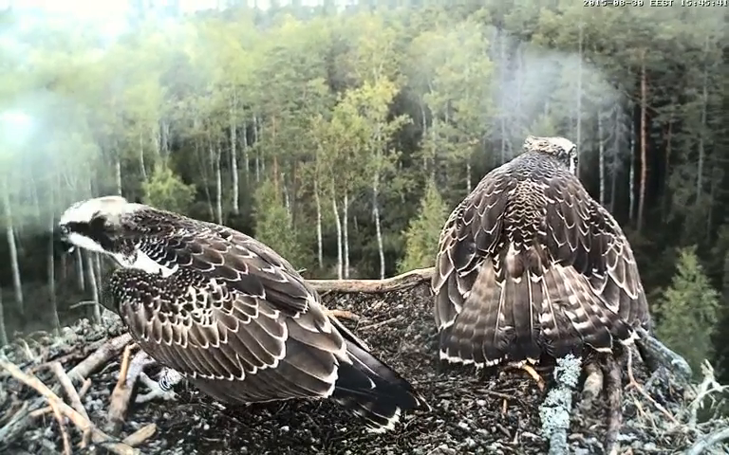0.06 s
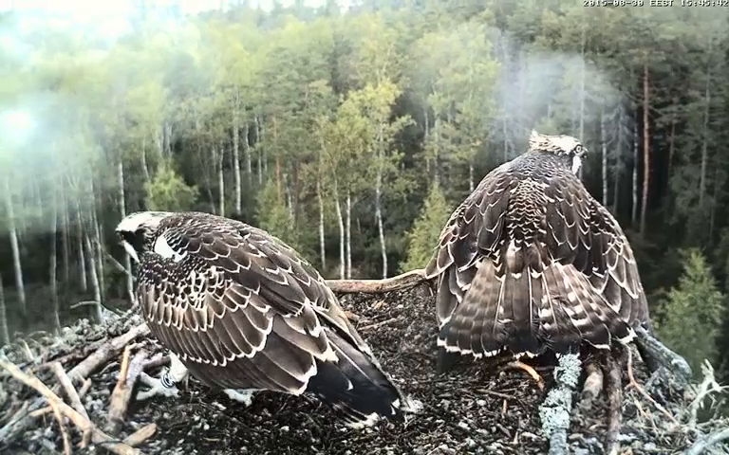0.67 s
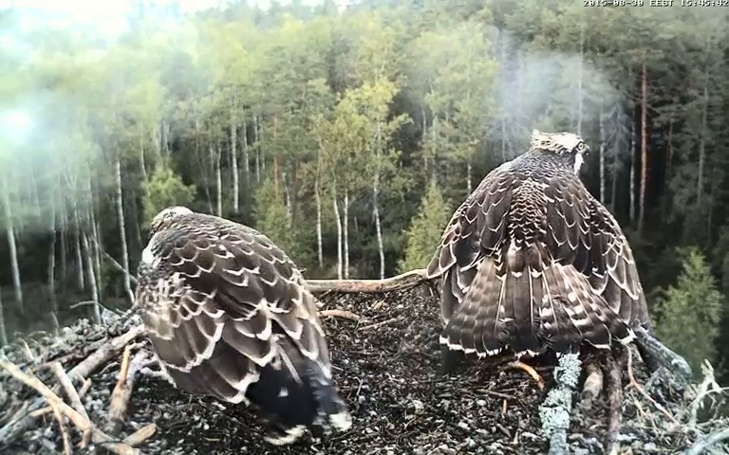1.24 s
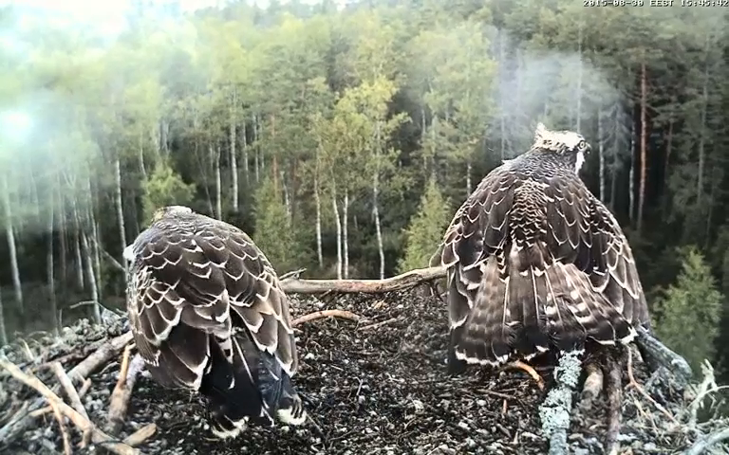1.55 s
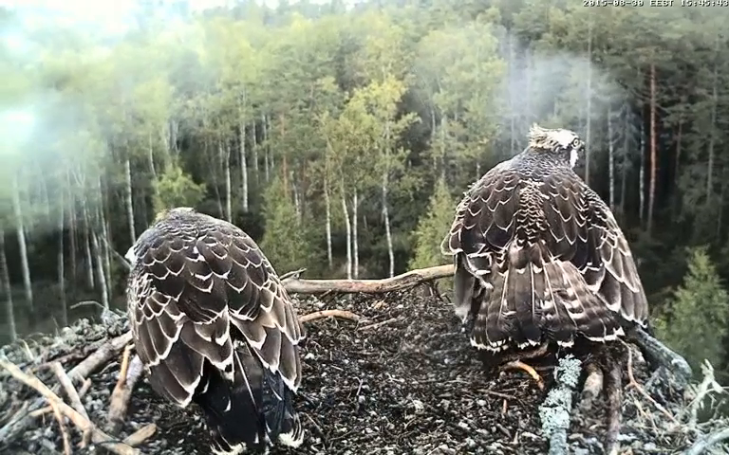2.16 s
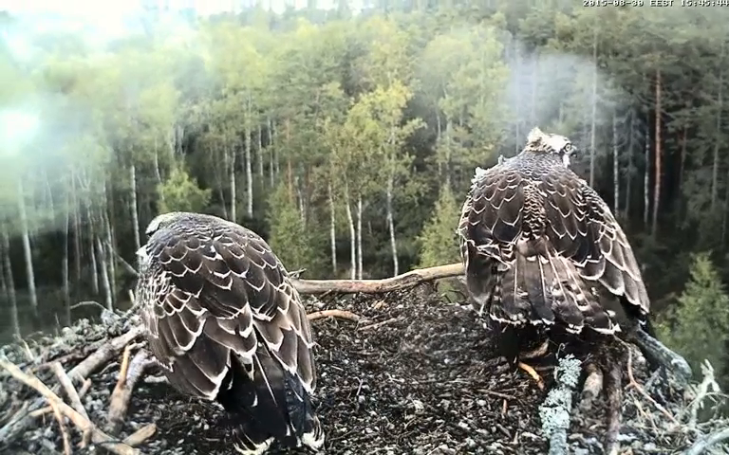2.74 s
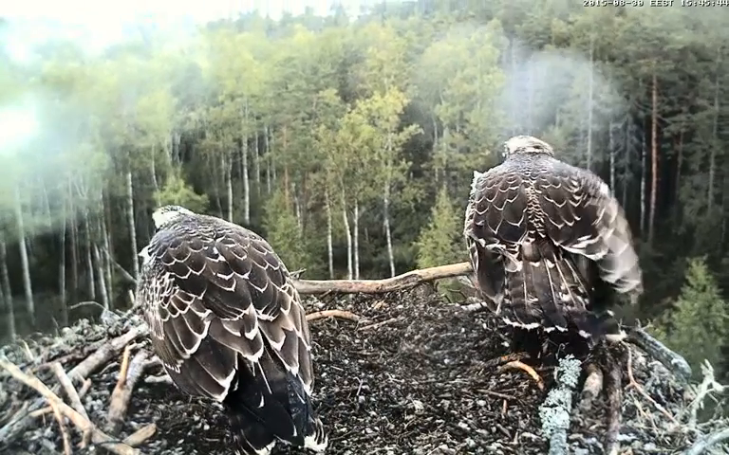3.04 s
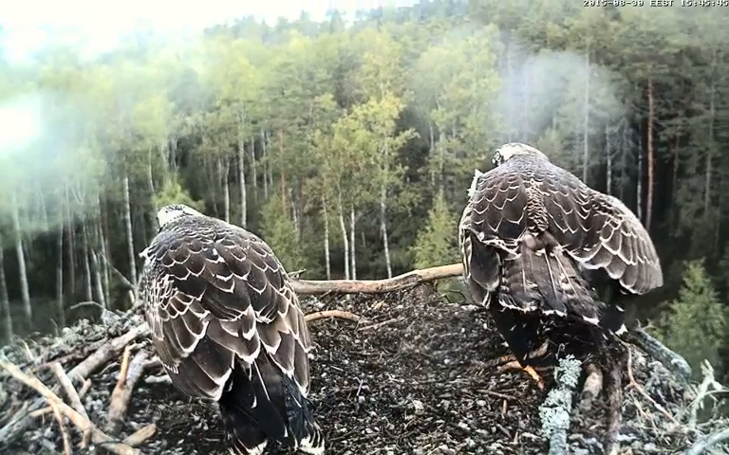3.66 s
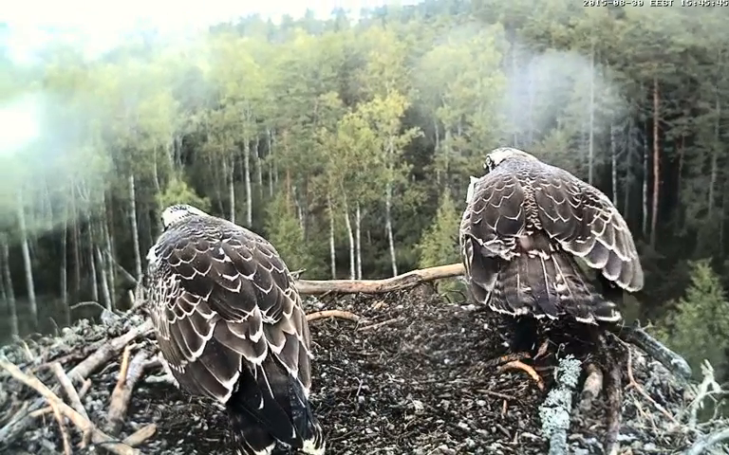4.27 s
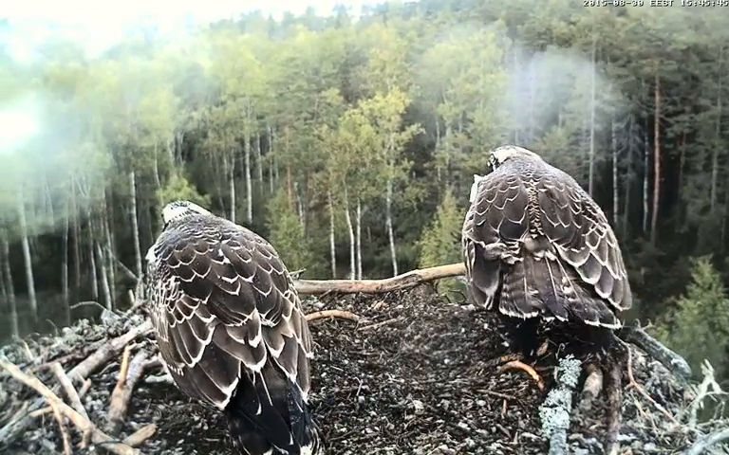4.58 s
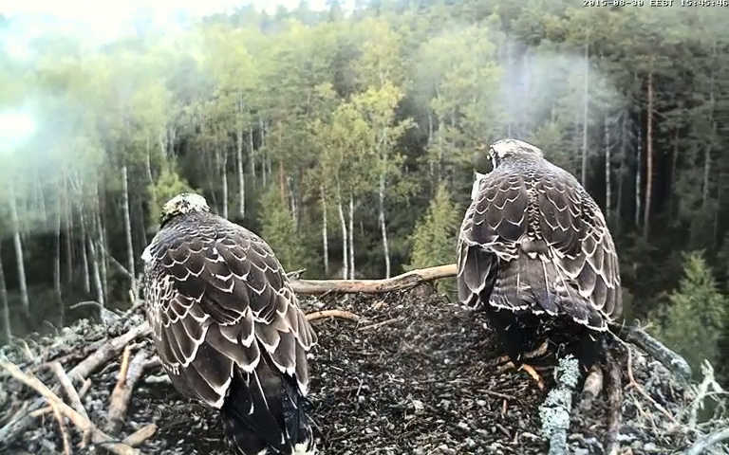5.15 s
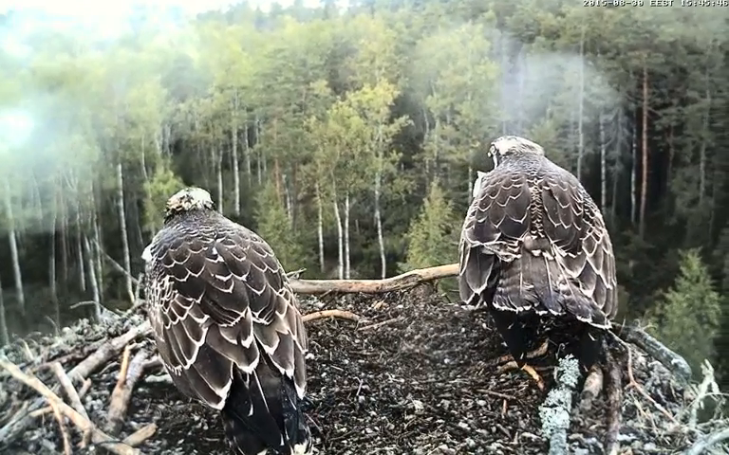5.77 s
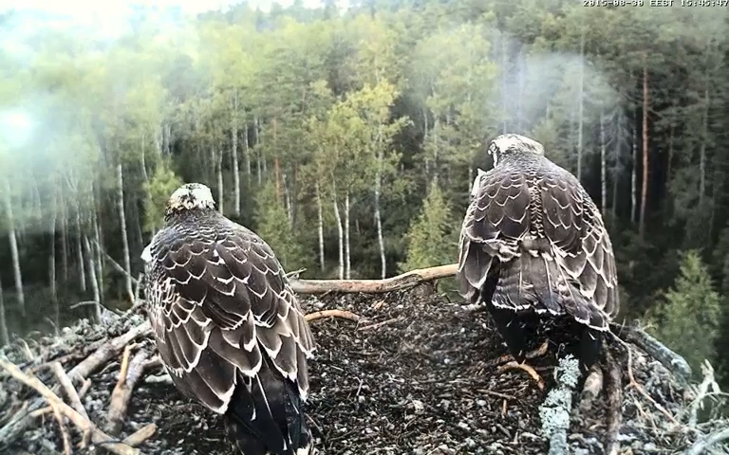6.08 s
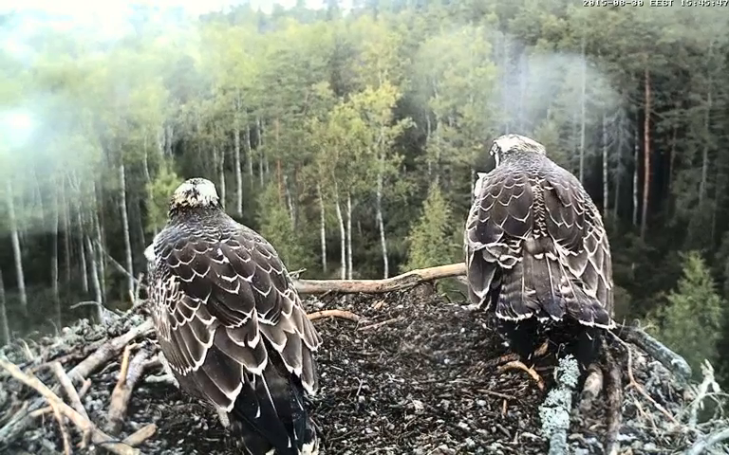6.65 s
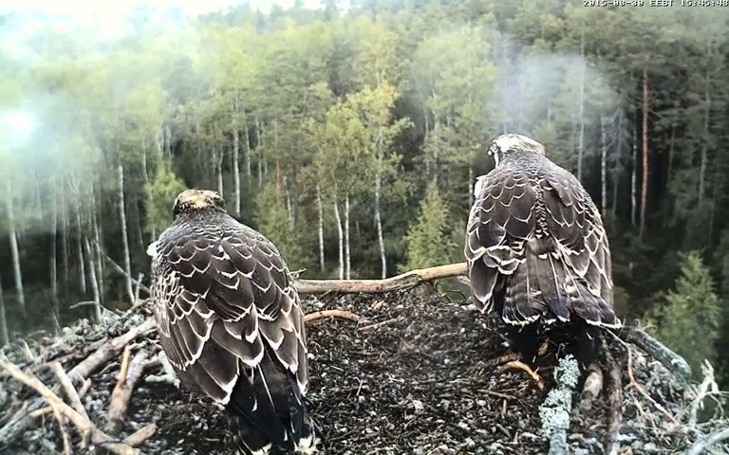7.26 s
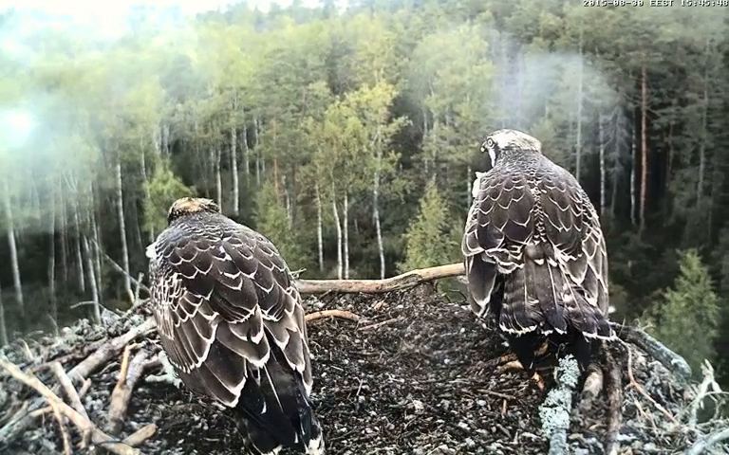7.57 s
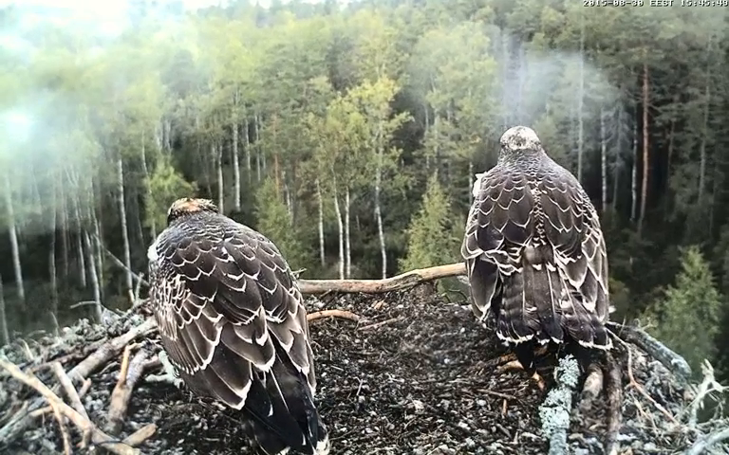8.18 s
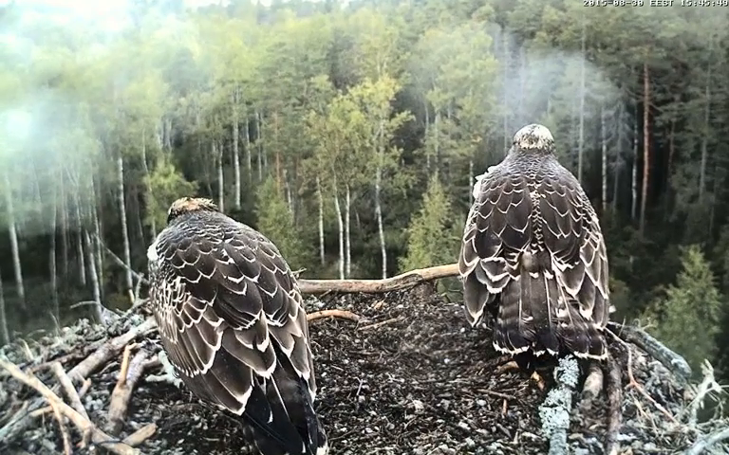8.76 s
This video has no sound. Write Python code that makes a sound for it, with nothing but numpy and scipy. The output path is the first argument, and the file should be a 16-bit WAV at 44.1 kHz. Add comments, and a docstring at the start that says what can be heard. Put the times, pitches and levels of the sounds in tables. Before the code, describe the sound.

Two young ospreys call on a stick nest, close to a microphone with little treble. From the start, one gives short, high chirps, about five a second, each jumping from a lower note into an arched whistle, until 1.7 seconds. A louder run follows from 2.6 to 5 seconds, and a softer one from 6 to 7.2. From about 1 second, the second bird adds thin, rising begging whistles, each about a third of a second long and roughly a second apart, loudest at 4.5. After a gap, two final whistles come alone near 7.9 and 8.5 seconds. Small throat creaks occur around 7 and 7.8. Beaks and talons occasionally tap dry sticks, most clearly at 0.7 and 2.9 seconds. Faint wind rushes throughout, with a slight buffet on the microphone around 6.5, and the trees return a faint echo.

```python
"""Young ospreys on the nest

Two birds call from a stick nest high above a forest, close to a narrow-band microphone.
One fires runs of short chirps, each breaking from a low note up into an arched whistle;
the other draws long, rising begging whistles. Beaks and talons tap the sticks,
a light wind lies underneath, and the trees return a faint late echo."""
import sys
import numpy as np
from scipy import signal
from scipy.fft import rfft, irfft
from scipy.io import wavfile
from scipy.ndimage import uniform_filter1d

SR = 44100
rng = np.random.default_rng(int(sys.argv[2]) if len(sys.argv) > 2 else 0)


def store_wav(level_fs):
    """Save 16-bit WAV to argv[1]."""
    pcm = np.round(np.clip(np.atleast_2d(level_fs), -1, 1) * 32767)
    wavfile.write(sys.argv[1], SR, pcm.T.astype(np.int16))


N = 388962
TIME = np.arange(N) / SR

# strength of the wind: time_s, level_db
WIND_STRENGTH = [(0.0, -51), (0.07, -56.5), (0.17, -45.5), (0.66, -49.5), (1.41, -38.5), (2.54, -51),
                 (3.1, -44), (3.17, -52), (4.68, -38), (5.02, -43), (5.44, -37), (5.54, -43), (6.1, -39.5),
                 (6.34, -45), (6.39, -37.5), (6.44, -38), (6.54, -38), (6.59, -43), (6.66, -36.5),
                 (7.27, -41), (7.39, -40), (7.83, -44), (8.03, -47), (8.76, -51.5)]
# buffets of wind on the microphone: centre_s, half_length_s, level_db
BUFFETS = [(6.386, .03, -35), (6.512, 0.046, -31.5)]
# colour of the low rush at the nest: frequency_hz, gain_db
RUSH_COLOUR = [(15, -59.5), (25, -33.5), (38, -23.5), (88, -7), (163, 1), (321, -3.5), (425, -6.5),
               (454, -9), (600, -12), (780, -39.5), (1320, -120)]
# colour of the wind in the trees: frequency_hz, gain_db
TREE_COLOUR = [(300, -15), (500, -2.5), (800, -0.5), (1200, -5), (2000, -7), (3000, -12), (3700, -14.5),
               (4300, -36)]
# beak and talon hits on the nest: start_s, level_db, tilt_db_per_octave
TAPS = [(0.121, -38, 17.5), (0.685, -17, -0.5), (0.845, -39.5, 21), (1.884, -30, -6.5), (1.997, -32.5, 8),
        (2.282, -37, 11), (2.429, -34, 7.5), (2.912, -19, 12), (5.028, -41, -7), (5.446, -30, 4),
        (8.02, -41.5, 8), (8.178, -41, 11)]
# colour of a tap's contact noise: frequency_hz, gain_db
CRACK_COLOUR = [(700, -20.5), (1400, 0), (2400, 1.5), (3600, 2.5), (4300, -13)]
# ring of the sticks: frequency_hz, gain_db, t60_s
STICK_MODES = [(1440, -5.5, 0.065), (1660, -10.5, 0.061), (2050, -8, .035), (2310, -5.5, 0.06),
               (2870, -6, 0.026), (3160, -18, 0.027), (3500, -12.5, 0.037)]
# colour of the hiss around a call: frequency_hz, gain_db
CALL_HISS_COLOUR = [(600, -11), (1300, -16), (2000, -4), (2800, -3), (3600, -5.5), (4300, -16)]
# throat and beak resonances: frequency_hz, gain_db, t60_s
THROAT_MODES = [(1440, -9.5, 0.0068), (1920, -3, 0.015), (2550, 0, 0.0033), (3570, -9, 0.0093)]
# creaks of a slack voice: start_s, end_s, pulses_per_s, level_db
CREAKS = [(7.027, 7.073, 183, -24), (7.084, 7.128, 210, -20.5), (7.822, 7.856, 140, -27),
          (8.466, 8.477, 157, -30.5)]
# begging whistles: start_s, end_s, first_hz, top_hz, rise_wait_s, bend (1 = straight), first_db, last_db
WHISTLES = [(1.068, 1.259, 2380, 2774, 0.0019, 2.4, -38.5, -31.5),
            (1.734, 2.009, 2440, 2856, 0, 2.23, -30, -21), (2.81, 3.145, 2466, 2914, 0, 2.2, -31.5, -23),
            (3.631, 3.939, 2470, 3142, 0.0035, 1.62, -27.5, -20.5),
            (4.454, 4.733, 2577, 3072, 0, 1.45, -17, -10), (5.207, 5.542, 2494, 3096, 0, 1.36, -29, -18),
            (6.047, 6.388, 2553, 3030, 0, 1.8, -24, -27), (7.847, 8.094, 2435, 2746, 0, 1.43, -26.5, -24),
            (8.487, 8.767, 2638, 3322, 0.053, 1.34, -24.5, -15)]
# chirps, each an opening note and then a whistle:
# start_s, opening_s, whistle_s, top_hz, opening_db, whistle_db, third_harmonic_db (against the whistle)
CHIRPS = [(-.075, 0.045, 0.11, 2710, -14, -14.5, -21.5), (.148, 0.035, 0.081, 2763, -15, -13.5, -18.5),
          (0.338, 0.028, 0.089, 2824, -13.5, -14, -12.5), (.526, 0.029, 0.087, 2810, -14, -13.5, -13.5),
          (.714, 0.027, 0.095, 2832, -12.5, -12, -16), (.91, .027, 0.097, 2819, -9.5, -10, -16),
          (1.105, .025, .094, 2787, -10.5, -9.5, -13), (1.3, 0.026, 0.091, 2832, -9, -10.5, -5.5),
          (1.496, 0.025, 0.17, 2903, -10.5, -13.7, -15.5), (2.563, 0.0096, 0.12, 2690, -31, -12.5, -20),
          (2.749, 0.031, 0.082, 2723, -10, -9, -16.5), (2.928, 0.031, 0.086, 2750, -10.5, -7.5, -27),
          (3.11, 0.036, 0.073, 2856, -7.5, -7.5, -17), (3.291, 0.032, 0.081, 2818, -6, -8.5, -11.5),
          (3.481, 0.025, 0.087, 2818, -5.5, -8.5, -7.5), (3.667, 0.028, 0.089, 2868, -3.5, -8, -20),
          (3.861, 0.022, 0.095, 2783, -10.5, -10.5, -4), (4.054, 0.034, .078, 2697, -7, -12.5, -12.5),
          (4.243, 0.025, 0.091, 2822, -8, -9.5, -8), (4.439, .027, .09, 2848, -11.5, -18.5, -12),
          (4.637, 0.034, 0.079, 2735, -11, -14.5, -19), (4.851, 0.021, .11, 2695, -27.5, -20, -9.5),
          (5.985, 0.016, 0.1, 2653, -18, -19.5, -9), (6.175, 0.04, 0.072, 2594, -13.5, -21.5, -13),
          (6.358, 0.036, 0.073, 2623, -15, -21.5, -7), (6.544, 0.03, 0.079, 2733, -15.5, -18.5, -20),
          (6.731, .041, 0.065, 2714, -11.5, -18.5, -20), (6.916, .044, 0.065, 2564, -11, -23, -22.5),
          (7.112, 0.012, 0.098, 2558, -48, -25, -7)]
# contour of a chirp's opening note: length_share, pitch_ratio, gain_db
OPENING_CONTOUR = [(0, .9, -20), (.2, .87, -17), (.42, .945, -4), (.62, 0.9826, 0.5), (.85, 1.0235, 1),
                   (1, 1.055, -2.5)]
# fade of a chirp's whistle: length_share, gain_db
CHIRP_FADE = [(0, -0.5), (.55, 0.5), (.72, -1), (.86, -5), (1, -24)]

USUAL_OPENING_S, USUAL_WHISTLE_S, USUAL_DB = .03, .088, -12   # a typical chirp
PURITY_DB_PER_DB = .51   # louder calls are purer: some side tones sink against the main one


def from_db(db):
    """Decibels to gain."""
    return 10 ** (np.asarray(db) / 20)


def rms_one(x):
    """Scale to rms 1."""
    return x / np.sqrt(np.mean(x ** 2) + 1e-20)


def along(rows, at):
    """Read a table's columns as straight-line curves over its first column."""
    first, *columns = np.transpose(rows)
    return [np.interp(at, first, column) for column in columns]


def drift(rate_hz):
    """Random modulation of rms 1, rolling off above the given rate."""
    hz = np.fft.rfftfreq(N, 1 / SR)
    return rms_one(irfft(rfft(rng.standard_normal(N)) / (1 + (hz / rate_hz) ** 2), N))


def noise(colour):
    """Noise of rms 1 with the given colour, falling away beyond its ends."""
    hz, db = np.transpose(colour)
    bins_hz = np.fft.rfftfreq(N, 1 / SR) + 1
    gain = from_db(np.interp(np.log(bins_hz), np.log(hz), db))
    skirts = np.minimum(1, bins_hz / hz[0]) ** 2 * np.minimum(1, hz[-1] / bins_hz) ** 4
    return rms_one(irfft(rfft(rng.standard_normal(N)) * gain * skirts, N))


def ring(clicks, hz, t60_s):
    """A unit click sets a sine of height 1 ringing."""
    decay, step = from_db(-60 / (t60_s * SR)), 2 * np.pi * hz / SR
    return signal.lfilter([0, np.sin(step)], [1, -2 * decay * np.cos(step), decay ** 2], clicks + 1e-18)


def resonance(hz, centre_hz, width_hz):
    """Gain of a resonance, 1 at its centre."""
    return 1 / np.sqrt(1 + (2 * (hz - centre_hz) / width_hz) ** 2)


def gate(t, start, end, edge_s):
    """1 between start and end, with soft edges."""
    return (1 + np.tanh((t - start) / edge_s)) * (1 - np.tanh((t - end) / edge_s)) / 4


def around(start, end):
    """The samples of a call, with 10 ms handles."""
    return np.flatnonzero((TIME > start - .01) & (TIME < end + .01))


def phase_of(hz):
    """Running phase of a pitch curve."""
    return 2 * np.pi * np.cumsum(hz) / SR


def wind(rush_db=-.5, trees_db=-6.5, lumps_db=1.68, still_db=-59):
    """The bed: one lumpy wind drives a low rush at the nest and a hiss from the trees."""
    strength = from_db(along(WIND_STRENGTH, TIME)[0] + lumps_db * drift(8.5))
    buffets = sum(from_db(db) * np.exp(-((TIME - centre) / half) ** 2) for centre, half, db in BUFFETS)
    rush = np.hypot(strength * from_db(rush_db), buffets) * noise(RUSH_COLOUR)
    tree_gain = np.hypot(strength, buffets) * from_db(trees_db)
    return rush + np.hypot(tree_gain, from_db(still_db)) * noise(TREE_COLOUR)


def forest_echo(sound, near_db=-27, near_t60_s=.05, far_db=-30, far_delay_s=.15, far_t60_s=.54):
    """Quick scatter from the nest, then a late diffuse echo from the trees."""
    t = TIME[:SR]
    near = rng.standard_normal(SR) * from_db(-60 * t / near_t60_s)
    far = rng.standard_normal(SR) * from_db(-60 * t / far_t60_s) * gate(t, far_delay_s, 1, edge_s=.02)
    echo = from_db(near_db) * near / np.linalg.norm(near) + from_db(far_db) * far / np.linalg.norm(far)
    return signal.fftconvolve(sound, echo)[:N]


def stick_taps(pivot_hz=2000, ring_growth=.21, crack_db=-8, crack_t60_s=.013):
    """A tap is a short dry crack; the harder it lands, the more the sticks ring after it."""
    start_s, level_db, tilt_db = np.transpose(TAPS)
    at = (start_s * SR).astype(int)
    hits = np.zeros(N)
    hits[at] = from_db(level_db + crack_db)
    decay = from_db(-60 / (crack_t60_s * SR))
    out = signal.lfilter([1], [1, -decay], hits + 1e-18) * noise(CRACK_COLOUR)
    ring_db = level_db + ring_growth * (level_db - level_db.max())
    for k, (hz, db, t60_s) in enumerate(STICK_MODES):
        clicks = np.zeros(N)
        scatter_db = rng.normal(0, 1.5, len(at))
        clicks[at] = from_db(ring_db + db + tilt_db * np.log2(hz / pivot_hz) + scatter_db)
        out += (-1) ** k * ring(clicks, hz, t60_s)
    return out


def call_hiss(voice, hiss_db=-29, patchy_db=4):
    """A patchy hiss follows the loudness of the calls."""
    envelope = np.sqrt(np.abs(uniform_filter1d(voice ** 2, size=128)))
    return from_db(hiss_db + patchy_db * drift(27)) * noise(CALL_HISS_COLOUR) * envelope


def throat_pulses(pop_db=-4, pop_top_hz=2200, creak_db=-4, air_db=-19):
    """The throat opens on a chirp with one soft pop; a creak is an uneven train of sharp, airy pops."""
    pops, creaks = np.zeros(N), np.zeros(N)
    for start, _, _, _, opening_db, whistle_db, _ in CHIRPS:
        if start > 0:
            pops[round(start * SR)] = from_db(min(opening_db, whistle_db) + pop_db)
    for start, end, per_s, db in CREAKS:
        pulse_s = np.arange(start, end, 1 / per_s)
        late, strength = rng.standard_normal((len(pulse_s), 2)).T
        at = ((pulse_s + .1 * late / per_s) * SR).astype(int)
        creaks[at] = from_db(db + creak_db + 2 * strength)
    puffs = signal.lfilter([1], [1, -.985], creaks + 1e-18)
    air = from_db(air_db) * puffs * rng.standard_normal(N)
    soft_pops = signal.sosfilt(signal.butter(2, pop_top_hz, fs=SR, output="sos"), pops + 1e-18)
    drive = soft_pops + creaks + air
    return sum((-1) ** k * from_db(db) * ring(drive, hz, t60_s)
               for k, (hz, db, t60_s) in enumerate(THROAT_MODES))


def begging_whistles(attack_s=.048, release_s=.04, skip_hz=2804, half_skip_hz=32.7, skip_reach_hz=117):
    """A nearly pure rising tone; a faint sub-octave shows as it crosses a throat resonance."""
    out = np.zeros(N)
    shake = 1 + .002 * drift(150) + .003 * drift(17)
    flutter_db = 1.6 * drift(30)
    for start, end, first_hz, top_hz, wait_s, bend, first_db, last_db in WHISTLES:
        at = around(start, end)
        t = TIME[at]
        rise = np.interp(t, [start + wait_s, end - release_s], [0, 1])
        hz = top_hz - (top_hz - first_hz) * (1 - rise) ** bend
        # the voice sticks just below one pitch, then skips over it
        from_skip = (hz - skip_hz) / skip_reach_hz
        hz = hz + half_skip_hz * np.tanh(20 * from_skip) * np.exp(-from_skip ** 2)
        # it scoops in from below, sags on the release and flicks down as it stops
        left_s = np.maximum(end - t, 0)
        scoop = .06 * np.exp(-np.maximum(t - start, 0) / .012)
        sag = .07 * np.maximum(1 - left_s / release_s, 0) ** 2
        flick = .082 * np.exp(-left_s / .0021)
        phase = phase_of(hz * (1 - scoop - sag - flick) * shake[at])
        attack_db = np.interp(t, [start, start + attack_s], [-9, 0])
        release_db = -14 * np.exp(-left_s / .0064)
        db = np.interp(t, [start, end - release_s], [first_db, last_db]) + attack_db + release_db
        throat = resonance(hz / 2, centre_hz=1380, width_hz=210) ** 2
        sub_octave = from_db(-27 - PURITY_DB_PER_DB * (db - USUAL_DB)) * throat * np.sin(phase / 2)
        envelope = from_db(db + flutter_db[at]) * gate(t, start, end, edge_s=.0018)
        out[at] += (np.sin(phase) + sub_octave) * envelope
    return out


def chirp_opening(share, pitch_hz, shake, level_db, octave_db=-26):
    """The rising low note before the break; the beak's resonance picks out its octave."""
    ratio, rise_db = along(OPENING_CONTOUR, share)
    phase = phase_of(pitch_hz * ratio * shake)
    beak = resonance(2 * pitch_hz * ratio, centre_hz=3960, width_hz=260) ** 2
    return (np.sin(phase) + from_db(octave_db) * beak * np.sin(2 * phase)) * from_db(level_db + rise_db)


def chirp_whistle(share, hz, shake, whistle_s, level_db, third_db, sway_db=.65, slip_rad=.09):
    """The fourth harmonic of a buzz near 700 Hz sings out; its wavering neighbours add hoarseness."""
    buzz = phase_of(hz * shake) / 4
    purer_db = PURITY_DB_PER_DB * (level_db - USUAL_DB)
    # as the pressure drops, the voice leans back to its third harmonic
    lean_db = third_db + np.interp(share, [0, .15, .4, .66, .82, 1], [-9, -8, 0, 0, -7, 10])
    # the fifth and sixth show only near a resonance of the mouth
    mouth_db = {k: 20 * np.log10(resonance(hz * k / 4, centre_hz=3530, width_hz=330)) for k in (5, 6)}
    harmonics_db = {1: lean_db - 27, 2: -24 - purer_db, 3: lean_db,
                    5: mouth_db[5] - 23.5 - purer_db, 6: mouth_db[6] - 35.5 - purer_db}
    hoarse = (whistle_s / USUAL_WHISTLE_S) ** 1.3   # longer chirps are rougher
    tone = np.sin(4 * buzz)
    for k, db in harmonics_db.items():
        # level and phase waver, most on the high harmonics
        sway, slip = (k * np.interp(share, np.linspace(0, 1, 40), rng.standard_normal(40))
                      for _ in range(2))
        tone += from_db(db + sway_db * sway) * np.sin(k * buzz + slip_rad * hoarse * slip)
    return tone


def chirps(jitter=.0036, opening_ratio=.7581, entry_ratio=.96, fall_ratio=.95, edge_s=.00067):
    """The voice opens on a low note, then breaks up into a whistle that swells, arches and falls."""
    out = np.zeros(N)
    shake = 1 + jitter * (drift(400) + drift(28))
    flutter = from_db(.35 * drift(40))
    for start, opening_s, whistle_s, top_hz, opening_db, whistle_db, third_db in CHIRPS:
        break_s = start + opening_s
        end = break_s + whistle_s
        at = around(start, end)
        t = TIME[at]
        # a voice that breaks early has had less time to rise: it enters flatter and softer
        early = np.log2(USUAL_OPENING_S / opening_s)
        opening_hz = top_hz * opening_ratio * (1 - .075 * early)
        entry_hz = top_hz * entry_ratio * (1 - .04 * early)
        entry_db = whistle_db - 1.74 - 4 * early
        opening = chirp_opening((t - start) / opening_s, opening_hz, shake[at], opening_db)
        # a long, well-prepared chirp holds its top, then falls ever faster
        hold = whistle_s / USUAL_WHISTLE_S * np.sqrt(opening_s / USUAL_OPENING_S)
        share = np.clip((t - break_s) / whistle_s, 0, 1)
        past_top = (share - .45) / .35   # 0 at the top, -1 a tenth into the whistle, +1 at the fall (share .8)
        climb_hz = (top_hz - entry_hz) * np.abs(past_top) ** (2.1 * hold)
        drop_hz = top_hz * (1 - fall_ratio) * np.abs(past_top) ** 3.1
        arch_hz = top_hz - np.where(past_top < 0, climb_hz, drop_hz)
        whistle = chirp_whistle(share, arch_hz, shake[at], whistle_s, whistle_db, third_db)
        swell_db = np.interp(share * hold, [.05, .38], [entry_db, whistle_db])
        whistle *= from_db(swell_db + along(CHIRP_FADE, share)[0]) * gate(t, break_s, end, edge_s)
        out[at] += (opening * gate(t, start, break_s, edge_s) + whistle) * flutter[at]
    return out


def scene(whistle_hiss_db=-7):
    """Both birds and the nest over the wind; the long whistles carry less hiss than the chirps."""
    chirping, whistling = chirps(), begging_whistles()
    hiss = call_hiss(chirping + from_db(whistle_hiss_db) * whistling)
    nest = chirping + whistling + hiss + throat_pulses() + stick_taps()
    return (nest + forest_echo(nest) + wind())[None]


def record(dry, mic_top_hz=4080, grit_db=-44, hiss_db=-100, ceiling=.71, cutoff_hz=15700):
    """A narrow-band microphone: faint grit rises above its band on loud calls, and the top peaks clip."""
    narrow = signal.sosfilt(signal.butter(20, mic_top_hz, fs=SR, output="sos"), dry)
    grit_gain = from_db(grit_db + 4 * drift(29)) * uniform_filter1d(narrow ** 2, size=256)
    grit = grit_gain * noise([(4200, -3.5), (5100, 2.5), (5800, -10), (8000, -12), (14000, -24)])
    hiss = from_db(hiss_db) * rng.standard_normal(N)
    clipped = np.clip(narrow + grit + hiss, -ceiling, ceiling)
    return signal.sosfilt(signal.ellip(10, .1, 80, cutoff_hz, fs=SR, output="sos"), clipped)


dry = scene()
out = record(dry)
store_wav(out)
```